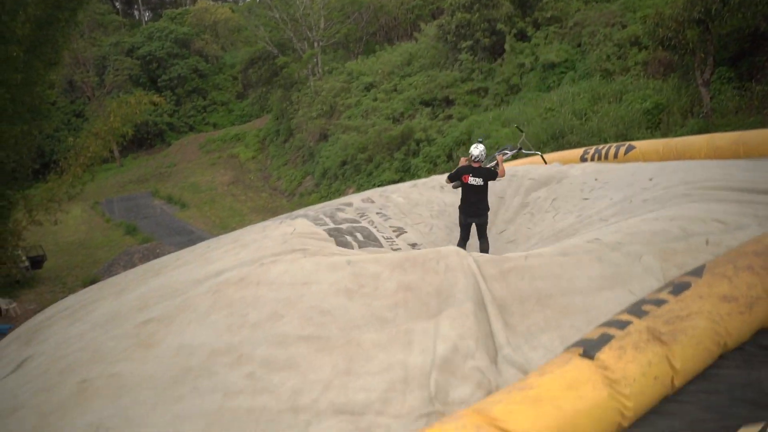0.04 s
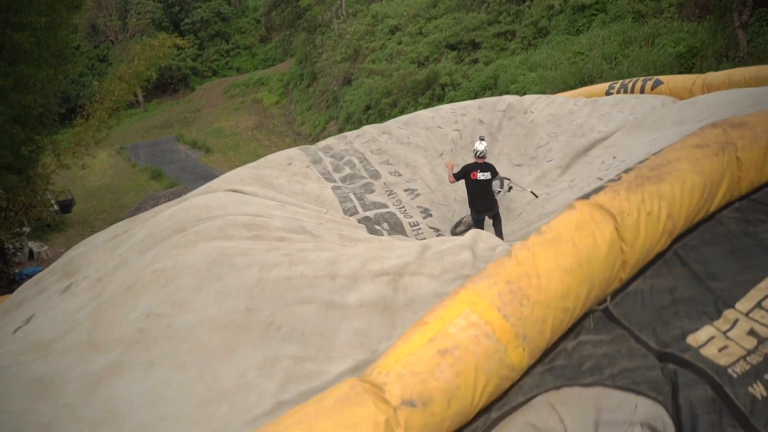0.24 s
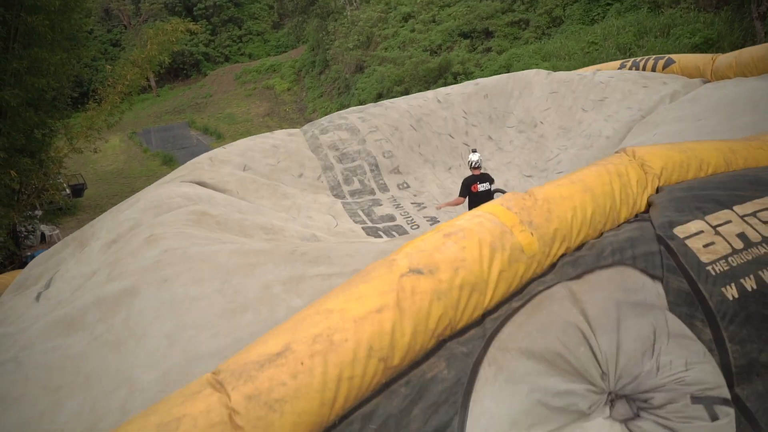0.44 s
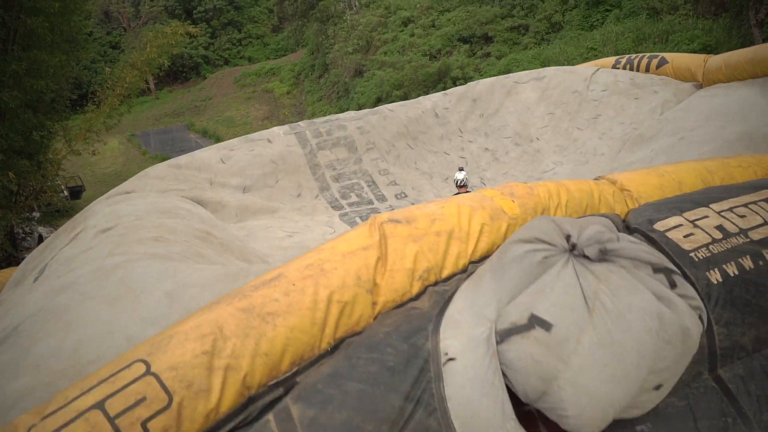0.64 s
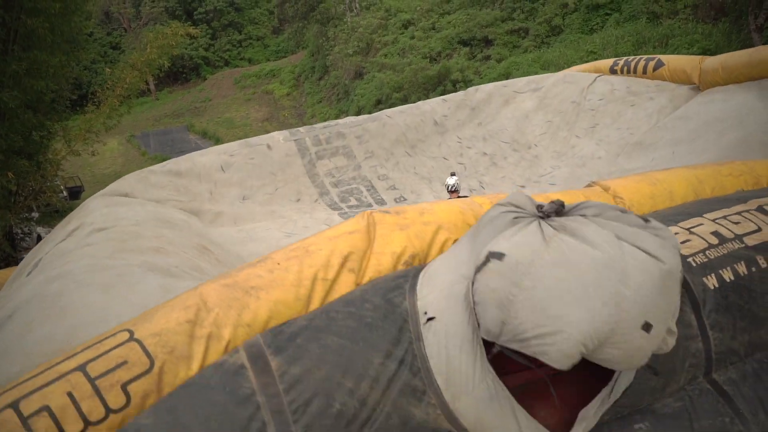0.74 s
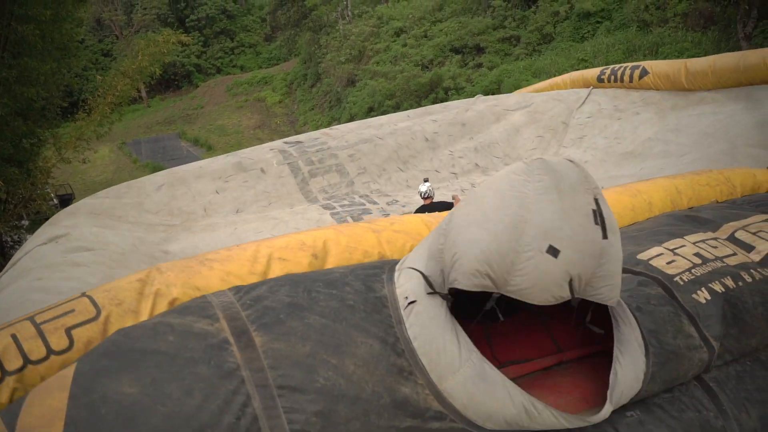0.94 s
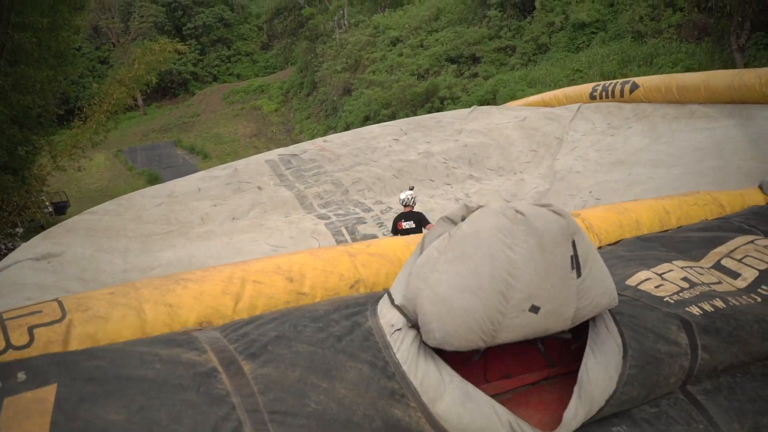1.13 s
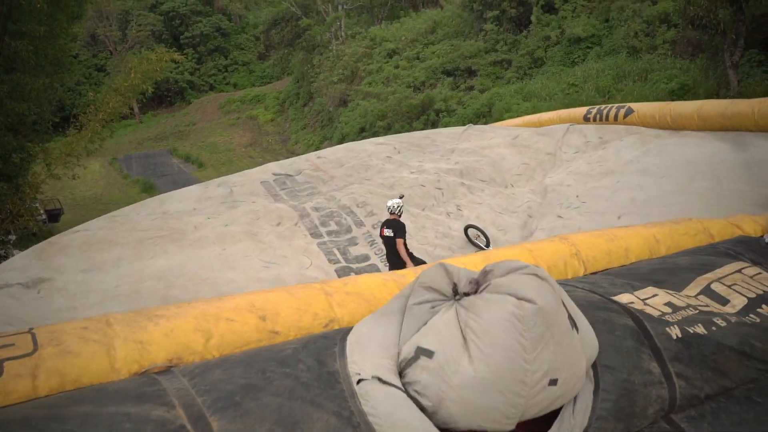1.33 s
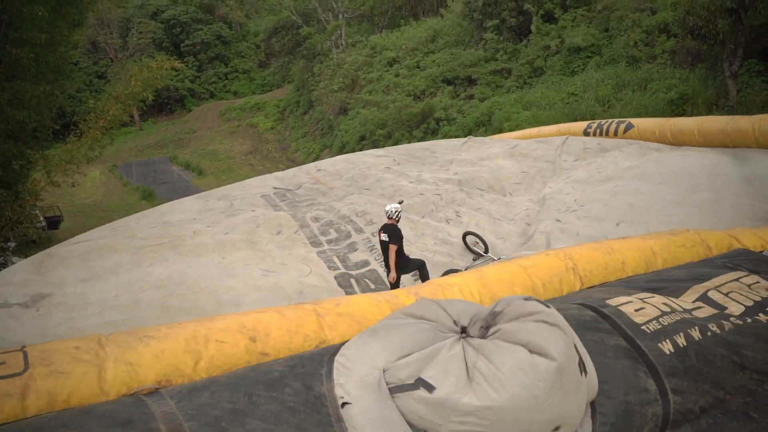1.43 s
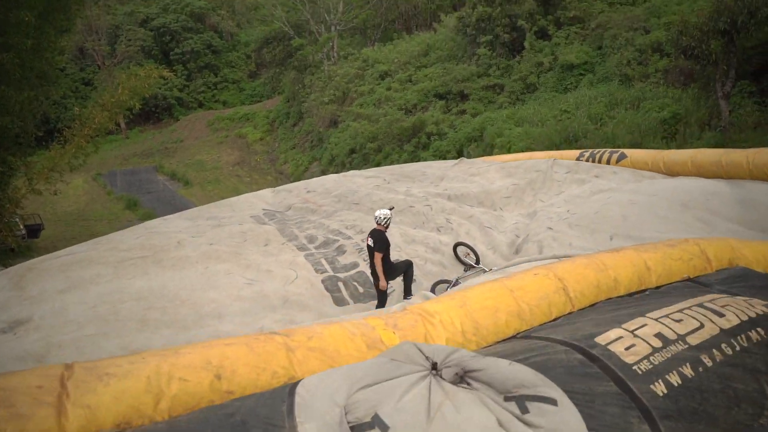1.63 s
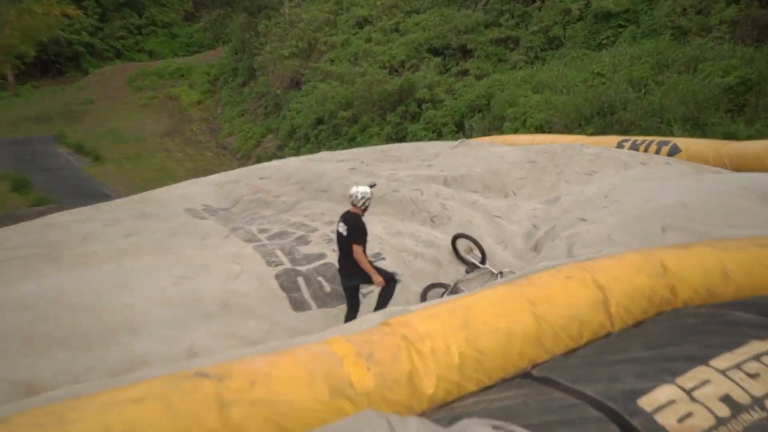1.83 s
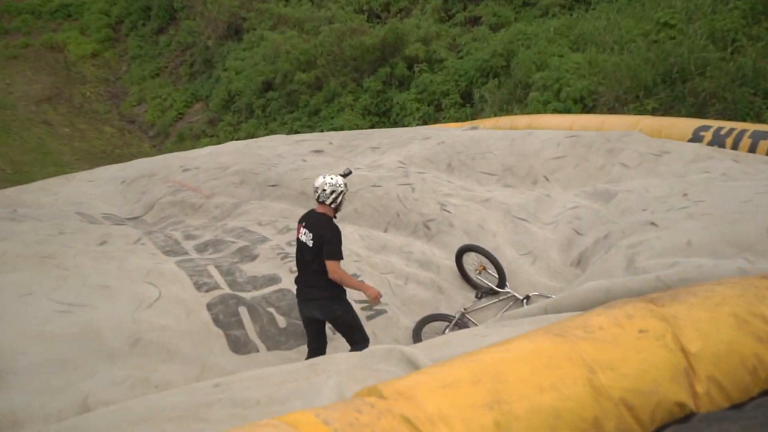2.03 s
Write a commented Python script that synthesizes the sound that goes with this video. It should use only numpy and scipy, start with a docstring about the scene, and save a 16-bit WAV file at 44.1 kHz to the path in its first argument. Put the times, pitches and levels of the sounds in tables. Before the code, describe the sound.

A quick cluster of dull thumps and vinyl snaps comes from a big outdoor airbag taking a bicycle landing, then softer bumps and dying vent hiss. Wind buffets the nearby microphone over a faint blower hum, with light clinks last.

```python
"""The skin of a big inflated airbag thumps and slaps as a rider and bicycle drop onto it outdoors.
Heard from the bag's edge, each blow drives a damped oscillation of the membrane; slack vinyl snaps
and crinkles, and displaced air leaves the vents as turbulent noise that dies away.
Behind it are light metal clinks, brushing cloth, a low rush of air, a faint blower hum
and wind on the microphone."""
import sys
import numpy as np
from scipy import signal
from scipy.io import wavfile

SR = 44100
rng = np.random.default_rng(int(sys.argv[2]) if len(sys.argv) > 2 else 0)


def to_wav(s):
    """Save 16-bit WAV."""
    ch = np.atleast_2d(s).T  # columns
    pcm = np.round(np.clip(ch, -1, 1) * 32767)  # PCM
    wavfile.write(sys.argv[1], SR, pcm.astype(np.int16))


N = 91419
T = np.arange(N) / SR


def from_db(db):
    """Amplitude ratio of a level in decibels."""
    return 10 ** (np.asarray(db) / 20)


def unit_rms(x):
    """Normalisation to an rms of 1."""
    return x / np.sqrt(np.mean(x ** 2) + 1e-20)


def decay(t, t60):
    """Exponential damping: the amplitude falls 60 dB in t60 seconds."""
    return np.exp(-np.log(1000) * t / t60)


def in_time(rows):
    """Linear interpolation of (t, value) rows at every sample."""
    return np.interp(T, *np.transpose(rows))


def add(out, onset, x):
    """Superposition of x on out, from an onset in seconds."""
    i = max(int(onset * SR), 0)
    out[i:i + len(x)] += x[:max(N - i, 0)]


def drift(rate_hz):
    """Slow random fluctuation: low-passed noise with an rms of 1."""
    hop, settle = 40, 2000
    pole = np.exp(-2 * np.pi * rate_hz * hop / SR)
    white = rng.standard_normal(N // hop + settle + 2)
    slow = signal.lfilter([1], [1, -2 * pole, pole * pole], white)[settle:]
    return np.interp(np.arange(N) / hop, np.arange(len(slow)), unit_rms(slow))


def band(x, hz, octaves):
    """Band-pass filtering about a geometric centre frequency."""
    edges = [hz / 2 ** (octaves / 2), min(hz * 2 ** (octaves / 2), SR * .47)]
    return signal.sosfilt(signal.butter(2, edges, "band", fs=SR, output="sos"), x)


def turbulence(spectrum, flutter_db, flutter_hz, tilt_db=0):
    """Noise in third octaves with partly correlated levels; tilt_db is per octave above 3 kHz."""
    centres = 22 * 2 ** (np.arange(29) / 3 + .12)
    white = rng.standard_normal((2, 2 * N))
    common = drift(flutter_hz)
    hz_points, db_points = np.transpose(spectrum)
    plain, tilted = 0, 0
    for k, hz in enumerate(centres):
        mean_db = np.interp(np.log(hz), np.log(hz_points), db_points)
        gain = from_db(mean_db + flutter_db * (common + drift(flutter_hz)))
        part = gain * band(white[k % 2, N * 3 // 4:], hz, 1 / 3)[-N:]
        plain += part
        tilted += part * from_db(tilt_db * max(np.log2(hz / 3000), 0))
    return tilted / np.std(plain)


# Envelopes of the low rush and of the gusts: t/s, level/dB
RUSH_ENVELOPE = [(0, -24.5), (.14, -23), (.27, -19.5), (.39, -23.5), (.62, -26), (.98, -29.5),
                 (1.24, -28.5), (1.38, -31), (1.85, -31), (1.93, -34.5), (2.07, -34)]
GUST_ENVELOPE = [(0, -20), (.035, -31.5), (.07, -26), (.19, -28), (.28, -20), (.39, -33), (.49, -23),
                 (.56, -34), (.9, -37), (1.25, -37), (1.6, -40.5), (2.07, -40)]
# Their spectral densities: f/Hz, relative level/dB
RUSH_SPECTRUM = [(40, -7.5), (80, -10.5), (135, -1.5), (200, -1.5), (300, -3.5), (450, -8), (650, -12.5),
                 (900, -21.5), (1500, -35.5), (4000, -32.5), (15000, -68)]
GUST_SPECTRUM = [(20, -7), (40, -9.5), (75, 0.5), (110, -0.5), (170, -10.5), (400, -36), (2000, -92)]
RUSH_GAIN_DB = 1


def wind():
    """Turbulent pressure fluctuation: a low rush of air, and gusts on the microphone."""
    rush = turbulence(RUSH_SPECTRUM, flutter_db=1.5, flutter_hz=18)
    gusts = turbulence(GUST_SPECTRUM, flutter_db=0.1, flutter_hz=4.4)
    return from_db(in_time(RUSH_ENVELOPE) + RUSH_GAIN_DB) * rush + from_db(in_time(GUST_ENVELOPE)) * gusts


# Partials of the blower hum: f/Hz, rms level/dB
HUM_PARTIALS = [(139, -43), (202, -38), (283, -45.5), (338, -47)]
HUM_WANDER = 0.01926  # rms fraction of the frequency


def blower():
    """Random amplitude and frequency modulation of a few partials gives an unsteady hum."""
    out = np.zeros(N)
    for hz, db in HUM_PARTIALS:
        amplitude = np.sqrt(2) * from_db(db + 2 * drift(3.7))
        frequency = hz * (1 + HUM_WANDER * drift(16.8))
        out += amplitude * np.sin(2 * np.pi * np.cumsum(frequency) / SR)
    return out


# Strokes of cloth close by: t/s, duration/s, level/dB, centre f/Hz
CLOTH_STROKES = [(.62, .018, -50, 13000), (0.632, .13, -46, 12500), (0.772, 0.046, -43.5, 3180),
                 (0.922, 0.076, -51, 10400), (.994, .016, -53, 12000), (1.16, 0.09, -60, 12500),
                 (2.017, 0.031, -51, 7600)]
CLOTH_ROUGHNESS_DB = 1.5


def cloth():
    """Sliding friction of cloth on cloth radiates short swells of bright, grainy noise."""
    out = np.zeros(N)
    for onset, duration, db, hz in CLOTH_STROKES:
        envelope = np.sin(np.pi * np.clip((T - onset) / duration, 0, 1)) ** 2
        friction = rng.standard_normal(N) * from_db(CLOTH_ROUGHNESS_DB * drift(200))
        out += from_db(db) * envelope * unit_rms(band(friction, hz, octaves=0.98))
    return out


# Contacts of small metal parts: t/s, level/dB
METAL_CONTACTS = [(1.8148, -37.5), (1.837, -41), (2.0565, -31.5), (2.059, -39)]
# Their normal modes: f/Hz, relative level/dB, t60/s
METAL_MODES = [(3880, 3, 0.019), (4240, -3, 0.023), (5040, -4, 0.017), (6700, -9, .01), (11500, -14, .009),
               (12500, -9, .009), (13400, -14, .008)]


def clinks():
    """Free vibration of metal: each contact excites the same damped modes with random weights."""
    out, t = np.zeros(N), T[:SR // 10]
    for onset, db in METAL_CONTACTS:
        for hz, mode_db, t60 in METAL_MODES:
            weight = from_db(db + mode_db + rng.normal(0, 2.5)) * rng.choice([-1, 1])
            add(out, onset, weight * np.sin(2 * np.pi * hz * t) * decay(t, t60))
    return out


# Envelope of the outflow through the vents: t/s, level/dB
OUTFLOW_ENVELOPE = [(0, -35), (.12, -33), (.26, -32), (.35, -32), (.48, -34), (.66, -39), (.97, -40.5),
                    (1.08, -43), (1.35, -43.5), (1.8, -41.5), (1.92, -46), (2.07, -43.5)]
# Spectral density of its hiss: f/Hz, relative level/dB
VENT_SPECTRUM = [(250, 7), (500, 2.5), (750, 3.5), (1100, 4.5), (1600, 0), (2700, -5.5), (3500, -6.5),
                 (4150, -4), (4900, -19), (6500, -15), (8400, -19), (10000, -22), (13000, -23),
                 (15800, -26.5)]
VENT_GAIN_DB, VENT_BRIGHTENING = 3.5, 0.16  # brightening in dB/octave per dB of flow


def vents(flow_db):
    """Jet noise: escaping air hisses louder and brighter as the flow grows."""
    tilt_db = VENT_BRIGHTENING * (flow_db - flow_db.mean())
    hiss = turbulence(VENT_SPECTRUM, flutter_db=1.2, flutter_hz=22, tilt_db=tilt_db)
    return from_db(flow_db + VENT_GAIN_DB) * hiss


CRINKLES_PER_S, CRINKLE_T60_CYCLES, CRINKLE_LOWPASS_HZ = 650, 8.4, 5500
CRINKLE_GAIN_DB, CRINKLE_DB_PER_OCTAVE = -7.5, -6.5


def crinkle(flow_db):
    """A Poisson process: tiny folds in the sagging skin click and ring, at a level set by the outflow."""
    clicks = rng.choice([-1, 1], N) * (rng.random(N) < CRINKLES_PER_S / SR)
    resonances = np.geomspace(600, 6000, 16)
    assigned = rng.integers(0, len(resonances), N)
    out = np.zeros(N)
    for k, hz in enumerate(resonances):
        radius = decay(1 / SR, CRINKLE_T60_CYCLES / hz)
        feedback = [1, -2 * radius * np.cos(2 * np.pi * hz / SR), radius ** 2]
        ring = signal.lfilter([1, 0, -1], feedback, clicks * (assigned == k) + 1e-18)
        out += from_db(CRINKLE_DB_PER_OCTAVE * np.log2(hz / resonances[0])) * ring
    lowpass = signal.butter(2, CRINKLE_LOWPASS_HZ, fs=SR, output="sos")
    return signal.sosfilt(lowpass, from_db(flow_db + CRINKLE_GAIN_DB) * unit_rms(out))


# Snaps of slack vinyl: t/s, initial level/dB, centre f/Hz, bandwidth/octaves, t60/s
VINYL_SNAPS = [(.006, -30, 5900, 1.4, .008), (.135, -19, 1140, 0.75, 0.019),
               (.183, -12.5, 1010, 0.56, 0.012), (0.1961, -22, 4000, 1.1, 0.024),
               (0.199, -33, 7500, .7, 0.055), (.211, -29, 6150, 0.23, 0.019),
               (.215, -21, 3530, 0.56, 0.015), (0.242, -26, 3730, 0.4, 0.0053),
               (.269, -19, 2260, 1.5, 0.013), (0.272, -30.5, 11500, 3, 0.021),
               (.279, -16, 3160, 0.6, 0.0065), (0.283, -30, 7040, .6, 0.013),
               (0.311, -21.5, 4970, 1, 0.0023), (.315, -30, 5500, 1.1, 0.0039),
               (0.3191, -14.5, 1280, 0.86, 0.0051), (.587, -36, 5500, 0.33, 0.0061),
               (0.618, -29.5, 2340, 1.2, 0.033), (0.717, -22, 2300, 0.95, 0.007),
               (0.963, -31, 1100, 1.5, 0.047), (1.152, -23.5, 880, 0.46, 0.0089),
               (1.17, -30.5, 1690, 1.5, .014), (1.844, -30.5, 1790, 1.6, 0.018),
               (2.028, -40.5, 7900, 0.4, .007), (2.033, -45, 9500, 2, .008), (2.042, -45, 8470, 0.89, .008),
               (2.0565, -44, 8500, 2.3, .01)]


def snaps():
    """Impulsive excitation: a fold pops taut and radiates a heavily damped burst of noise."""
    out, t = np.zeros(N), T[:SR // 8]
    for onset, db, hz, octaves, t60 in VINYL_SNAPS:
        envelope = decay(t, t60)
        burst = band(rng.standard_normal(len(t)) * envelope, hz, octaves)
        add(out, onset, from_db(db) * unit_rms(burst) * np.sqrt(np.mean(envelope ** 2)))
    return out


# Blows on the skin: t/s, peak level/dB, initial f/Hz, rise time/s, t60/s
SKIN_BLOWS = [(.002, -13, 69.5, 0.018, 0.08), (.1825, -9.5, 533, 0.0012, 0.021),
              (.195, -4, 211, 0.0032, 0.0048), (.216, -2, 82, 0.0062, 0.062),
              (.249, -6, 367, 0.0025, 0.008), (.268, -9.5, 290, 0.0025, 0.023),
              (0.277, -11.5, 112, 0.0048, 0.053), (.318, -17, 550, 0.0015, 0.017),
              (.337, -7, 200, 0.0033, 0.011), (.349, -11.5, 189, .002, 0.023),
              (0.407, -10.5, 97, 0.013, 0.18), (.4135, -8, 350, .005, 0.03),
              (.483, -16, 580, 0.0018, 0.013), (.543, -17, 258, 0.0028, 0.022),
              (0.773, -13.5, 120, 0.0034, 0.029), (1.041, -16.5, 257, 0.0048, 0.021),
              (1.158, -16.5, 116, 0.007, 0.033), (1.842, -25, 370, 0.0044, 0.037)]
SAG_PER_S, SLAP_DB = 6.4, -15.5  # fractional growth of the period; noise against the swing's peak


def thumps():
    """Damped membrane oscillation with a dull slap of noise; the pitch falls as the skin gives way."""
    out, t = np.zeros(N), T[:SR // 4]
    for onset, db, hz, rise, t60 in SKIN_BLOWS:
        attack = np.sin(np.pi / 2 * np.minimum(t / rise, 1))
        envelope = attack * decay(np.maximum(t - rise, 0), t60)
        frequency = hz / (1 + SAG_PER_S * t)
        swing = np.sin(2 * np.pi * np.cumsum(frequency) / SR)
        slap = from_db(SLAP_DB) * unit_rms(band(rng.standard_normal(len(t)), 2 * hz, octaves=1.86))
        add(out, onset, from_db(db) * envelope * (swing + slap))
    return out


# Early reflections off the bag: delay t/s, relative level/dB
BAG_REFLECTIONS = [(.0063, -25), (.0147, -14), (.031, -21)]


def scene():
    """Superposition of the background, the vents, and the contact sounds with their reflections."""
    flow_db = in_time(OUTFLOW_ENVELOPE)
    contacts = clinks() + crinkle(flow_db) + snaps() + thumps()
    reflected = sum(from_db(db) * np.interp(T - delay, T, contacts, left=0)
                    for delay, db in BAG_REFLECTIONS)
    return (wind() + blower() + cloth() + vents(flow_db) + contacts + reflected)[None]


def record(dry):
    """Band limiting removes the deepest rumble and the highest treble."""
    highpass = signal.butter(1, 20, "high", fs=SR, output="sos")
    lowpass = signal.ellip(10, .2, 80, 15750, fs=SR, output="sos")
    return signal.sosfilt(lowpass, signal.sosfilt(highpass, dry))


dry = scene()
out = record(dry)
to_wav(out)
```